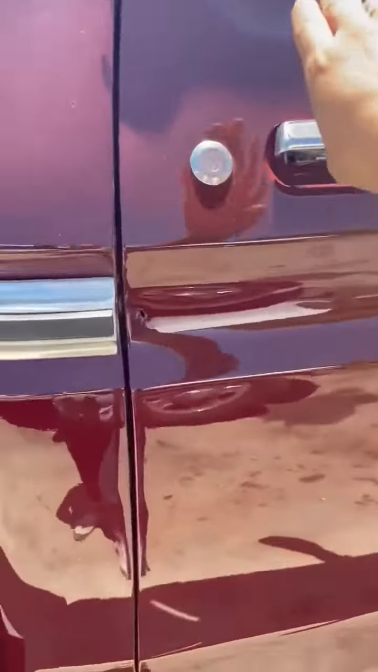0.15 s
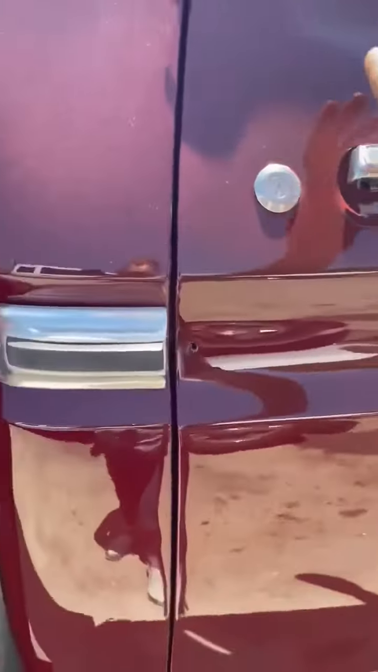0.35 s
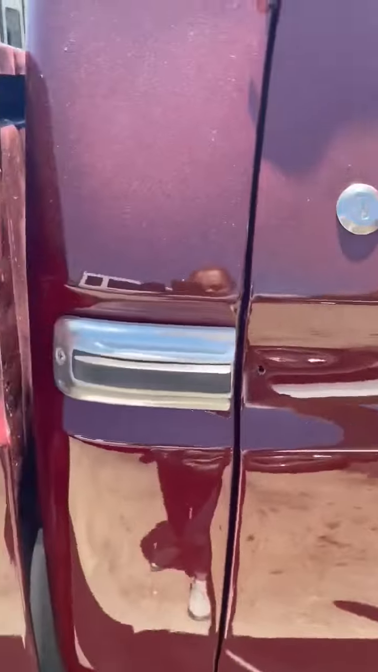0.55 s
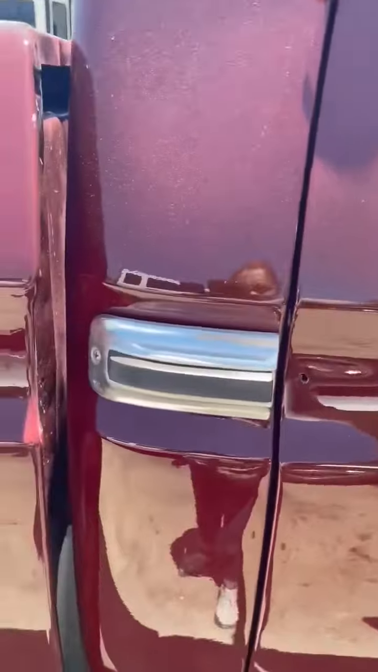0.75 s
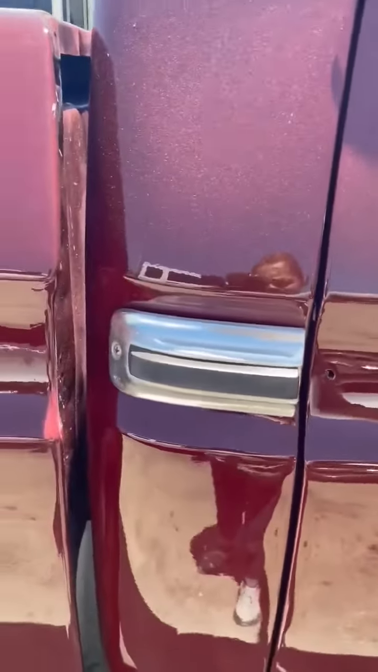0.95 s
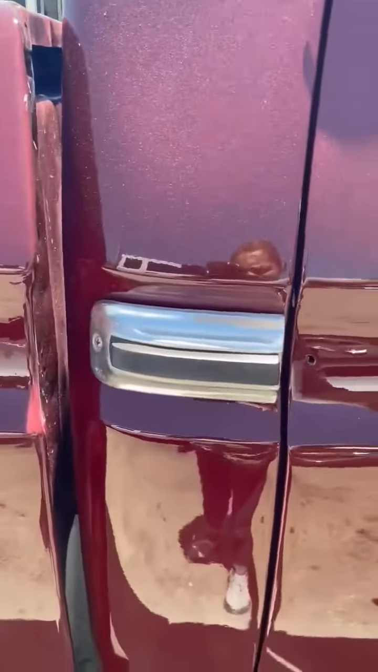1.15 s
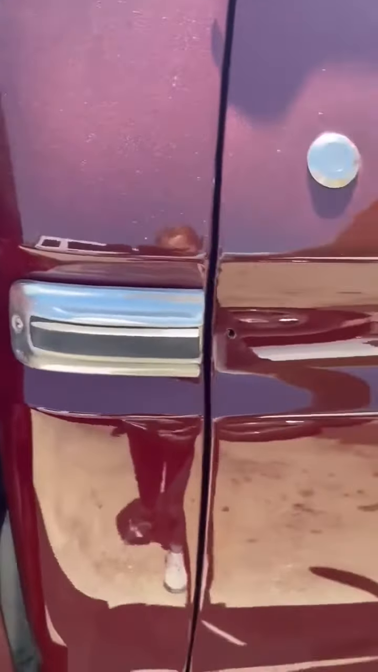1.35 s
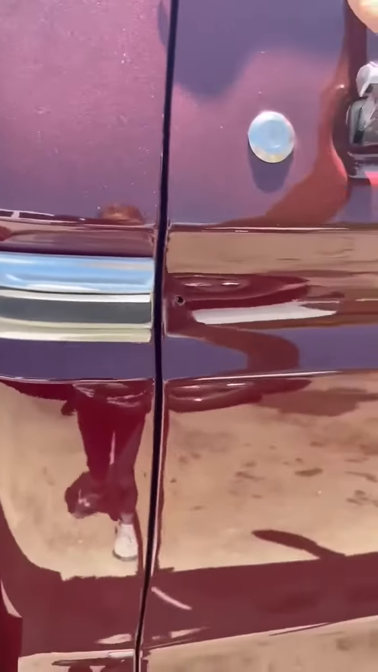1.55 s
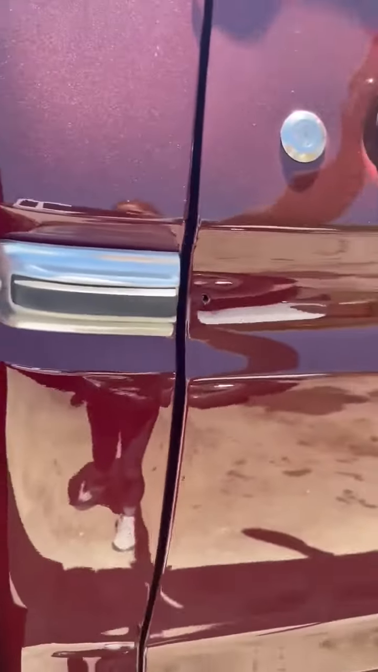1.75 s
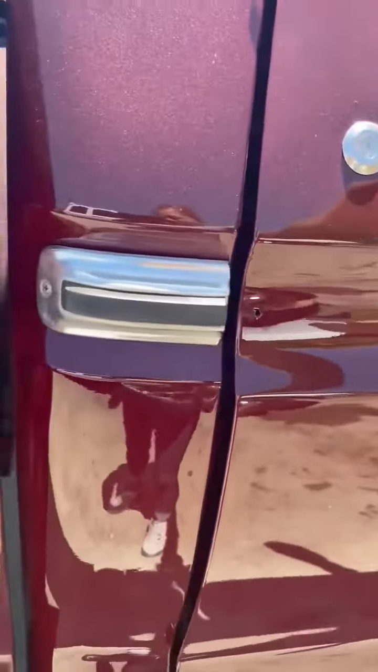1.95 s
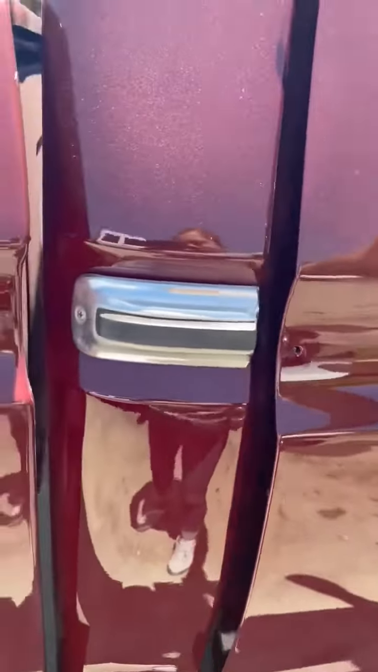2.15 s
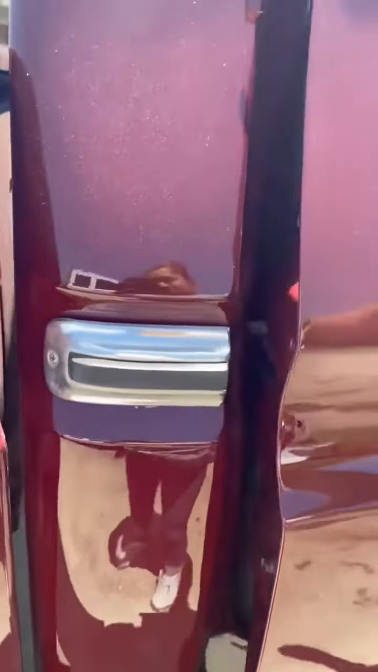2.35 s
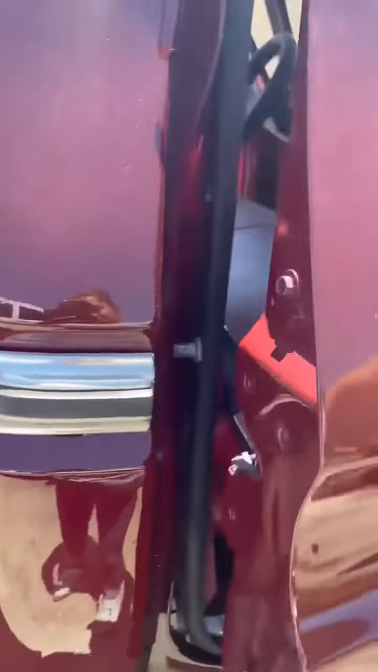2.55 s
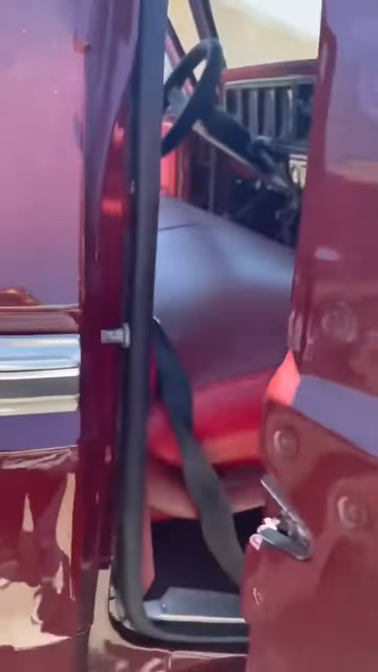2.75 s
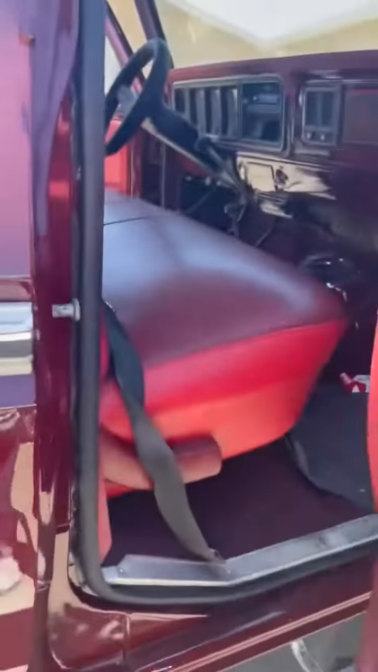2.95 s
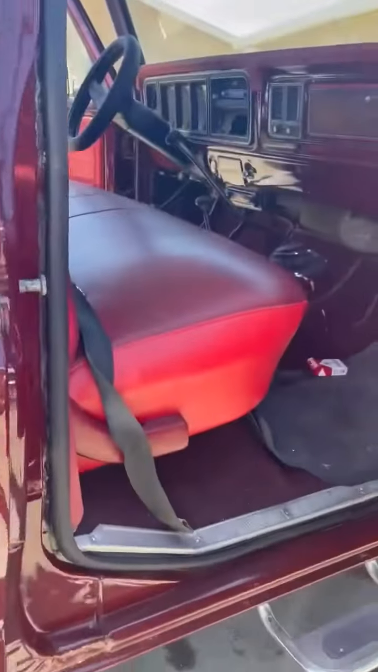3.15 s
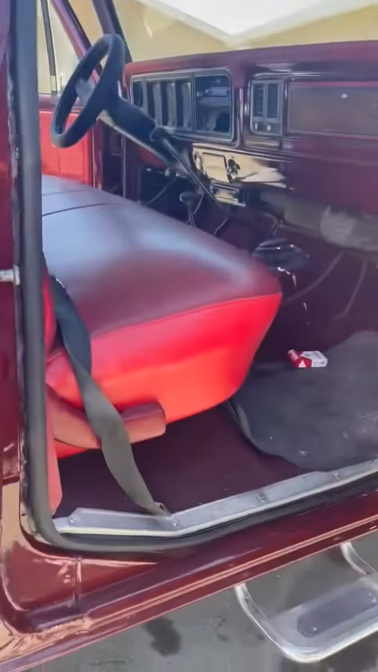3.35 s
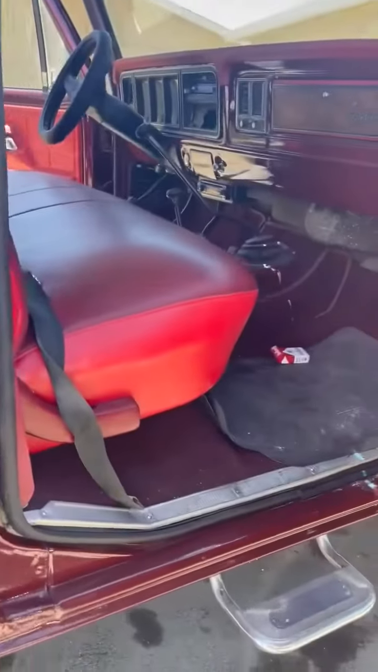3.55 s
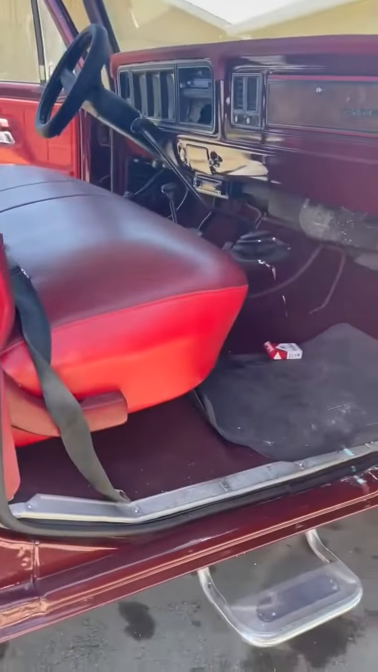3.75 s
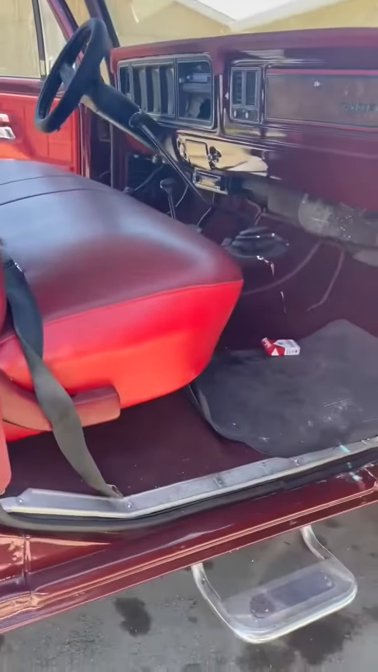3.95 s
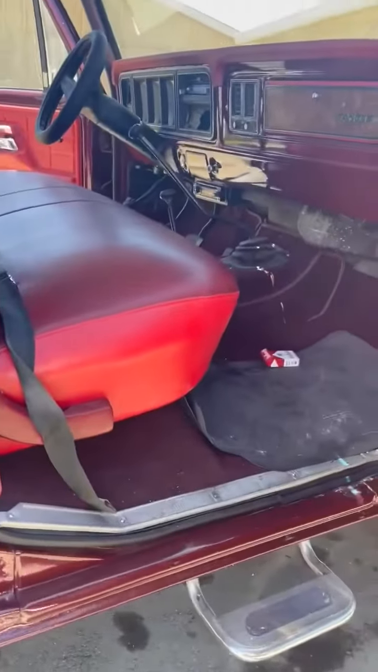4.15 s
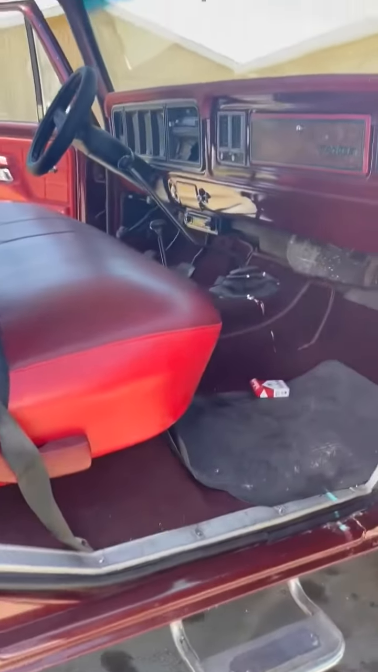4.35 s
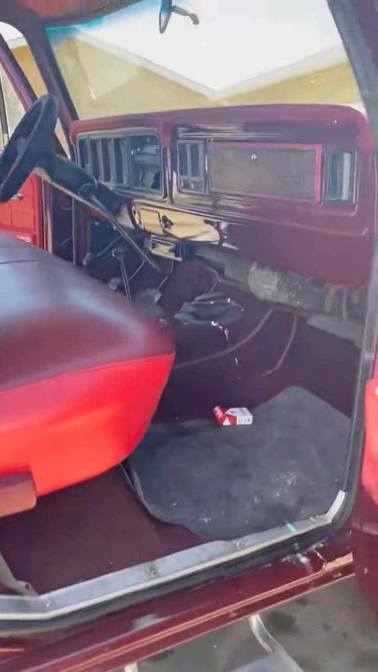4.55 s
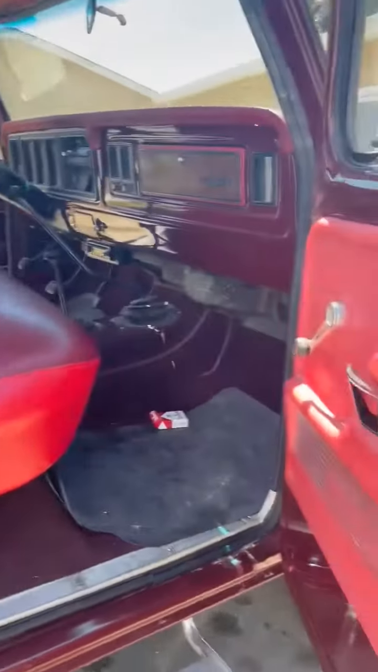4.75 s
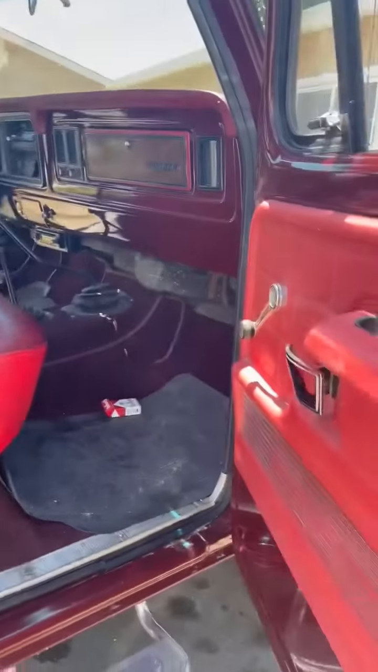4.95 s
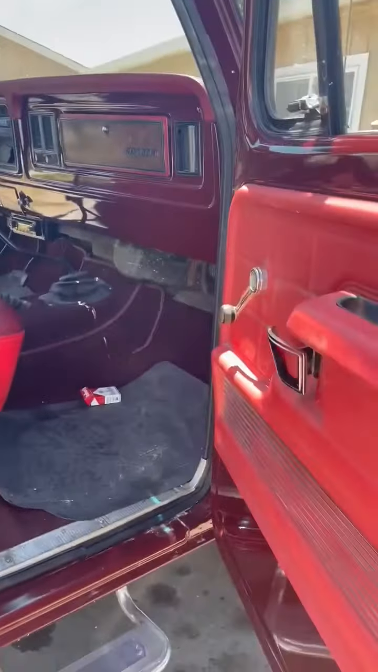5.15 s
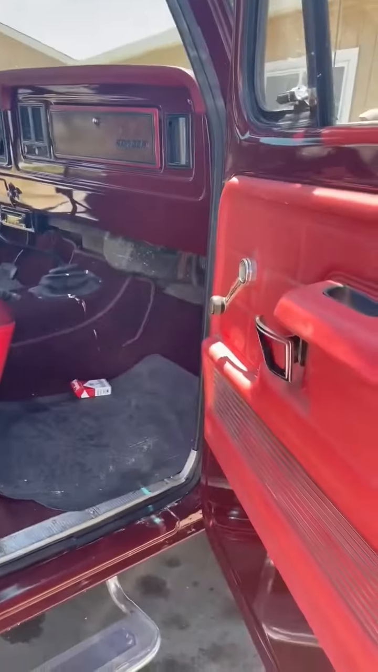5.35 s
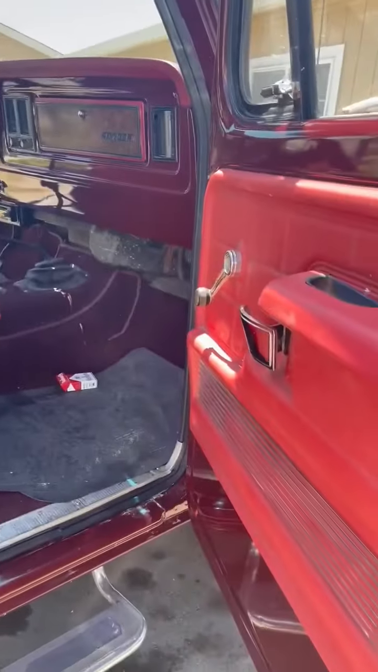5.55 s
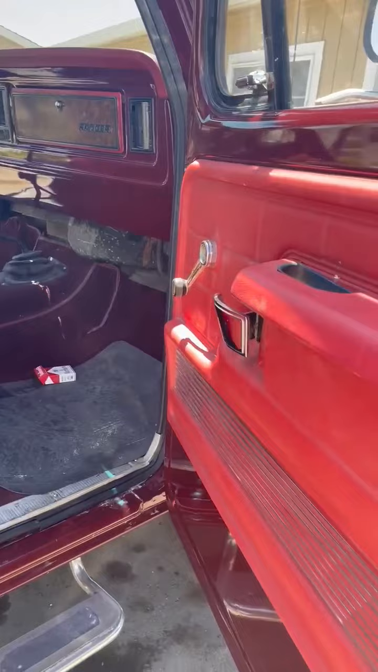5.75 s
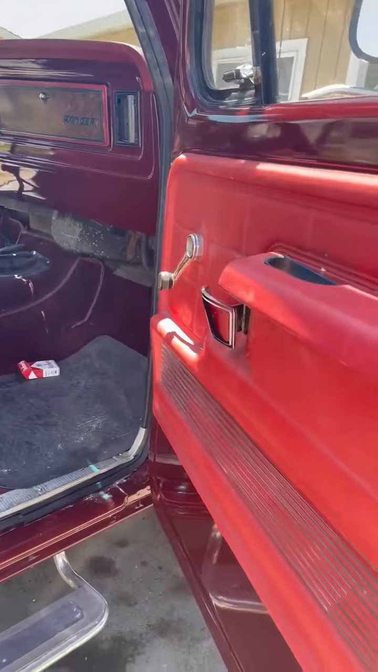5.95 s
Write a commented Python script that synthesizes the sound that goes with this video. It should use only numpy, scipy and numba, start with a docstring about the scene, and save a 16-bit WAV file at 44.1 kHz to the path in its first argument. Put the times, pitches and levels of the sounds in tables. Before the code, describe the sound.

Quiet open air with soft hiss, low rumble and a faint far hum, heard by a phone held close to an old truck's metal door. A barely audible tap comes at 0.1 s, then light dull handle knocks from 0.5 to 0.9. Around 1.1 a tight cluster of springy metallic clicks leads to a hard bright snap at 1.3. After a short gap, the latch lets go at 1.6 with the fullest clunk, metallic with a low hollow thump. From 1.75 to 2.2 the seal and hinge drag in a rough, grainy rub with small knocks and rattles, capped by a sharp knock at 2.18. A softer bump at 2.93 marks the door stop, with little taps after. Low, dull footfalls follow from 3.1, strongest near 3.6, then a brief gritty scuff and small thuds at 4.35-4.7. Only faint air and hum remain to 6 s.

```python
"""Old pickup door, opened by hand

A hand works the handle: linkage clicks, the latch lets go with a clunk, the seal drags free and
the door swings to its stop. Blows ring one set of damped door modes, filled out by dense noise;
the seal is stick-slip noise, and the thumps of the skin and the feet are short decaying sines.
Soles scuff grit; shaped noise makes the open air, a far hum, low rumble and faint narrow tones.
A phone held close hears it all."""
import sys
import numpy as np
from scipy import signal
from scipy.fft import rfft, irfft
from scipy.io import wavfile
from scipy.ndimage import uniform_filter1d
from numba import njit

SR = 44100
rng = np.random.default_rng(int(sys.argv[2]) if len(sys.argv) > 2 else 0)


def wav_out(sig):
    """Save sig, one row per channel (or a flat mono array), as 16-bit PCM at SR to the path in sys.argv[1]."""
    wavfile.write(sys.argv[1], SR, np.round(np.clip(np.atleast_2d(sig).T, -1, 1) * 32767).astype(np.int16))


N = 264159

# Open air before the phone: start_s, level_db (of the 300-6000 Hz part of the mid)
AIR_LEVEL = [(0.0, -52), (1.23, -50), (1.37, -52.5), (1.63, -48.5), (2.1, -48.5), (2.3, -55), (3.02, -50.5),
             (3.32, -54.5), (5.99, -55)]
# Spectrum of the air noise: pitch_hz, gain_db
AIR_COLOUR = [(59, -42.5), (100, -13.5), (165, -8.5), (210, -19), (487, -12.5), (684, -15.5), (1200, -17),
              (1350, -21.5), (1650, -19.5), (1860, -22.5), (2620, -23.5), (7270, -31.5), (9500, -38),
              (12000, -46), (15600, -73.5), (22000, -120)]
# Width of the air: pitch_hz, side_gain_db
AIR_SIDE = [(60, -28), (110, -24), (190, -19), (350, -3), (630, -1.5), (1120, -4), (2020, -5), (3630, 0.5),
            (6530, -6.5), (11700, 22)]
# A far machine: pitch_hz, width_hz, level_db, full_turn_change_db, left_minus_right_db
HUM = [(172, 14, -69, 10, 3.5), (333, 59, -58.5, -6.5, 12.5)]
# Low rumble: start_s, level_db
RUMBLE_LEVEL = [(0.0, -50.5), (.5, -43.5), (.65, -48), (.95, -37.5), (1.15, -48), (1.3, -60), (1.55, -44),
                (1.77, -38.5), (1.92, -40.5), (2.22, -41), (2.45, -49.5), (3.07, -42.5), (3.42, -51.5),
                (4.6, -52.5), (4.8, -55), (5.99, -52.5)]
# Spectrum of the rumble noise: pitch_hz, gain_db
RUMBLE_COLOUR = [(12, -38), (20, -17), (30, -10), (39, -2.5), (56, 0), (90, -5.5), (145, -7), (178, -12),
                 (300, -14), (390, -44), (660, -120)]
# Blows on handle, latch and door:
# start_s, part (name), panel_db, body_db, steel_db, half_rise_s, low_rattle_decay_s
KNOCKS = [ (.091, "stop", -49.5, -52, -59, 0.0021, 0.052), (.525, "handle", -42.5, -33, -41, 0.00056, 0.13),
          (.657, "handle", -42.5, -32, -42, 0.00041, 0.1), (.82, "card", -46, -31.5, -62, .003, .11),
          (.868, "skin", -54, -40, -55, 0.0028, 0.072), (1.0505, "rod", -56, -55, -42, .0003, .012),
          (1.053, "rod", -60, -27.5, -60, .002, 0.05), (1.108, "handle", -26.5, -28, -28, .0006, 0.077),
          (1.117, "spring", -33, -31, -48, .002, .03), (1.134, "spring", -32, -40, -27, 0.001, 0.08),
          (1.141, "spring", -30, -36, -26, .001, .05), (1.147, "handle", -23, -28, -14, .0004, 0.03),
          (1.148, "rod", -27, -45, -21, .0005, .04), (1.152, "spring", -26, -28, -21, .001, .045),
          (1.236, "handle", -43, -42, -48, .0012, 0.015), (1.273, "pawl", -26, -30, -17, 0.006, 0.02),
          (1.2875, "bolt", -13.5, -24, -8.5, 0.0018, 0.03), (1.293, "latch", -12, -21, -10, .0008, 0.018),
          (1.297, "latch", -15, -22, -19, .0006, .015), (1.304, "bolt", -25, -30, -30, .002, .07),
          (1.313, "latch", -26, -39, -42, .004, .07), (1.595, "catch", -16, -16, -11, .003, .042),
          (1.604, "catch", -19, -24, -7.5, .0016, 0.027), (1.61, "catch", -21, -25, -17.5, .0007, 0.1),
          (1.754, "skin", -36.5, -37.5, -63, 0.00071, 0.2), (1.784, "skin", -33, -32, -60, .0015, .042),
          (1.8, "hinge", -38, -36, -60, .001, .04), (1.866, "hinge", -38, -40, -60, .002, .03),
          (1.975, "striker", -38, -40, -52, .001, .08), (1.847, "rod", -48, -33.5, -48, 0.0022, .02),
          (1.881, "hinge", -26, -31, -44, 0.0005, 0.04), (1.897, "latch", -31, -28, -56, .001, .04),
          (1.907, "skin", -30, -28, -52, .001, 0.06), (1.932, "striker", -37, -34, -60, .002, .04),
          (1.951, "skin", -45, -32, -62, .001, .02), (2.007, "trim", -30, -34.5, -31, .0015, 0.1),
          (2.038, "trim", -33, -35.5, -28, .002, 0.09), (2.112, "rod", -38, -35.5, -54, 0.0015, 0.03),
          (2.138, "rod", -32, -33.5, -52, .0009, 0.16), (2.168, "striker", -24, -40, -42, 0.0023, .023),
          (2.1755, "striker", -11, -25, -34, 0.0009, 0.03), (2.184, "striker", -18, -25, -42, .001, .06),
          (2.196, "rod", -28.5, -27, -51, 0.002, .11), (2.235, "trim", -32.5, -31, -39, 0.00085, 0.065),
          (2.466, "skin", -50, -49, -67, 0.0021, 0.14), (2.615, "trim", -62, -65, -54, .001, .04),
          (2.69, "rod", -57, -65, -56, .001, .03), (2.769, "skin", -62, -44, -56, .002, 0.098),
          (2.923, "stop", -27, -36, -44, 0.005, 0.09), (2.941, "stop", -31, -38, -46, .002, .07),
          (2.962, "stop", -37, -38, -58, .002, .08), (3.06, "hinge", -53, -55, -65, .0005, .02),
          (3.078, "card", -48, -43, -62, .002, .04), (3.092, "striker", -38, -41, -48, 0.002, 0.05),
          (3.105, "handle", -40, -41, -54, .002, .06), (3.596, "stop", -55, -53, -54, 0.00069, .03),
          (4.172, "handle", -51, -65, -48, 0.00027, .012)]
# Where a blow lands sets its colour: body_hz, panel_hz, steel_hz, treble_top_hz,
# panel_and_steel_focus_db, boom_over_body_db, lean_db (left over right, before the side is coloured)
PARTS = {"handle": (255, 1101, 6400, 10500, -1, -6, -3.5), "rod": (405, 1506, 3299, 5500, -2, -13.5, 1.5),
         "latch": (574, 1152, 4893, 10500, -2, -14, -2.5), "catch": (348, 1051.5, 5320, 6800, 1.5, -5, 0.5),
         "hinge": (576, 2146, 4206, 7000, -1, -21, 4), "skin": (315.5, 1200, 2900, 4200, -8, -4, -4),
         "striker": (420, 1300, 3600, 6500, -2, -10.5, -3), "trim": (383, 1602, 5505, 9002, -11, -9.5, -2),
         "pawl": (500, 1900, 4900, 6200, 6, -14, -2.5), "bolt": (574, 1400, 7700, 10500, 1.5, -14, -2.5),
         "spring": (275, 1650, 6400, 7500, -5, -10, -3.5), "card": (480, 950, 2800, 3200, -4, -8, -2),
         "stop": (291.5, 2090, 3301, 5500, 5, -6.5, -2)}
# Modes of the whole door: pitch_hz, level_db, longest_t60_s
DOOR_MODES = [(115, 0, 0.051), (275, -8, .08), (333, -11.5, .5), (400, -10, 0.3), (600, -10, 0.2),
              (678, -10, .1), (802, -12, .08), (1042, -5, 0.18), (1152, -10, .1), (1285, -8, 0.15),
              (1450, -10, 0.09), (1647, -14, .09), (1800, -10, 0.13), (1916, -12, .15), (2093, -16, 0.2),
              (2242, -14, .15), (2430, -19, 0.11), (2690, -15, 0.1), (2910, -12, 0.1), (3250, -18, .12),
              (3470, -18, .1), (3690, -16, 0.1), (3910, -20, 0.14), (4140, -20, 0.1), (4800, -14, 0.1),
              (5195, -14, 0.06), (5355, -12, 0.09), (5850, -15, 0.07), (6240, -18, 0.07), (6510, -16, 0.09),
              (6990, -18, .07), (7700, -15, 0.08), (8250, -19, 0.1), (8900, -19, 0.07)]
# Width of the door sounds: pitch_hz, side_gain_db
DOOR_SIDE = [(60, -17), (110, -29), (190, -24), (350, -12), (630, -2.5), (1120, -9.5), (2020, -9),
             (3630, -4), (6530, -6.5), (11700, 21.5)]
# Low and high edges of the panel, boom, body and steel bands in turn: edge_hz
BAND_EDGES_HZ = [700, 2500, 95, 200, 200, 700, 2500, 11000]
# Quiet tail of the dense ring for panel, boom, body, steel: decay_s
BAND_TAIL_S = [0.17, 0.07, 0.26, 0.15]
# Trim and seals damp the modes of panel, boom, body, steel: longest_t60_s
LONGEST_RING_S = [0.075, 0.08, 0.085, 0.045]
# Dense ring against the modes for panel, boom, body, steel: level_db
DENSE_DB = [0, 2.5, .5, 0]
# Two drags of the rubber seal and hinge: start_s, level_db, treble_db (against the level)
DRAG = [
    [(.75, -61.5, -4.5), (.87, -53.5, -1), (1.05, -57, -3)],
    [(1.7, -54, -33), (1.77, -41, -25), (1.83, -40, -21), (1.95, -38, -18), (2.05, -35, -11),
     (2.1, -42, -9), (2.17, -47, -5), (2.35, -54.5, -12)],
]
# Faint narrow tones around the work on the latch: start_s, end_s, pitch_hz, level_db
WHINES = [(1.36, 1.58, 400, -54), (1.324, 1.6, 2080, -60), (1.64, 1.75, 2200, -59), (.91, 1.03, 2100, -59)]
# The door skin thumps and hums under harder blows: start_s, level_db, first_hz, last_hz, t60_s
THUMPS = [(1.117, -27, 300, 265, .07), (1.152, -25, 290, 265, .09), (1.2935, -21, 230, 170, .028),
          (1.601, -7, 250, 115, .095), (1.599, -27, 58, 58, .4), (1.882, -28, 590, 570, .16),
          (2.182, -25, 380, 325, .16), (2.186, -26, 410, 400, .3), (2.205, -30, 140, 125, .08),
          (2.93, -37, 330, 215, .2), (2.932, -38, 500, 480, .12), (2.98, -37, 110, 110, .12)]
# Dull thuds of feet on the ground: start_s, level_db, pitch_hz
THUDS = [(3.12, -37, 140), (3.218, -38, 70.3), (3.248, -41.5, 82), (3.43, -41.5, 75), (3.573, -25.5, 83.4),
         (3.638, -36.5, 64.6), (3.701, -39.5, 90), (3.739, -34.5, 53.2), (3.849, -36, 61.6),
         (3.91, -37.5, 67.3), (4.028, -37.5, 56.6), (4.393, -43, 310), (4.403, -41, 108), (4.43, -45, 260),
         (4.451, -34, 159.5), (4.47, -36, 132), (4.669, -44.5, 148)]
# Soles scuffing grit: start_s, level_db, length_s
SCUFFS = [(4.349, -52, .008), (4.359, -38.5, .016), (4.374, -46, .025), (4.40, -53, .08),
          (4.496, -39, .012), (4.51, -36, .028)]

PORT_LAG = 24  # samples between the two microphone ports
TURN_S = 4.51  # the phone turns towards the open door
BOOM_HZ = 135
LOW_FOCUS_DB = -1  # boom and body get the same focus for all parts
MODE_SCATTER_DB = 3  # each blow favours other modes
DETUNE = .004  # spread of mode pitches: the loose door never rings twice quite alike
SNAP_DB = 7  # first hard touch, added over the rattle
WHINE_WIDTH_HZ = 45
SAG_S = .006  # time constant of the pitch sag as the skin settles
THUD_DECAY_S = 0.12  # to -60 dB
THUD_SLAP_DB = -13  # noisy contact on top of a thump or thud
STONE_LOW_HZ, STONE_HIGH_HZ = 900, 8200
STONE_S, STONE_DB = .0022, 2  # half width of a click, level of all the clicks in a scuff
TOP_HZ = 11900  # the phone's upper limit


def undb(db):
    """Turn decibels into an amplitude factor."""
    return 10 ** (np.asarray(db) / 20)


def unit(x):
    """Bring a signal to an RMS of one."""
    return x / np.sqrt(np.mean(x ** 2))


def band(x, lo, hi):
    """Keep the pitches between lo and hi in Hz."""
    return signal.sosfilt(signal.butter(2, [lo, hi], "band", fs=SR, output="sos"), x)


def colour(x, points):
    """Shape the spectrum by pitch_hz, gain_db points, straight lines on a log pitch scale."""
    hz, db = np.transpose(points)
    f = np.fft.rfftfreq(x.shape[-1], 1 / SR) + 1  # the 1 Hz keeps the log finite
    curve = undb(np.interp(np.log(f), np.log(hz), db))
    return irfft(rfft(x) * curve, x.shape[-1])


def gain(table, column):
    """Draw a gain in time from a dB column, silent outside the table."""
    rows = np.array(table)
    return undb(np.interp(np.arange(N) / SR, rows[:, 0], rows[:, column], left=-200, right=-200))


def walk(rate):
    """Wander through random levels held 1 / rate s and slewed twice."""
    hold = int(SR / rate)
    steps = np.repeat(rng.standard_normal(N // hold + 1), hold)
    slewed = uniform_filter1d(uniform_filter1d(steps, hold), hold)
    return unit(slewed[:N])


def stereo(mid, side, points, lean_db=0):
    """Make left and right from mid and side; the side share depends on pitch."""
    # sound from one flank cancels where the lag is whole cycles, and adds up there in the middle
    side = side - 0.47 * np.roll(side, PORT_LAG)
    mid = mid + 0.028 * np.roll(mid, PORT_LAG)
    lean = np.tanh(lean_db * np.log(10) / 40)
    side = colour(side + lean * mid, points)
    return np.array([mid + side, mid - side])


def add(out, sound, s):
    """Lay a sound into the mix at s seconds."""
    i = int(s * SR)
    out[..., i:i + sound.shape[-1]] += sound[..., :N - i]


def grit(size, spread_db):
    """Noise of uneven grains: a random boost on every sample makes it spiky."""
    boost = np.minimum(rng.exponential(1, size), 5)
    return rng.standard_normal(size) * undb(spread_db * boost)


@njit
def ring(x, hz, size, t60):
    """Damped modes driven by x, each a decaying rotation."""
    y = np.zeros(len(x))
    for k in range(len(hz)):
        turn, z = np.exp((2j * np.pi * hz[k] - np.log(1000) / t60[k]) / SR), 0j
        for i in range(len(x)):
            z = z * turn + x[i]
            y[i] += size[k] * z.imag
    return y


def air():
    """Wide hiss of open air: coloured noise with a slowly uneven level."""
    mid, side = (colour(rng.standard_normal(N), AIR_COLOUR) for _ in range(2))
    scale = np.std(band(mid, 300, 6000))
    return stereo(mid, side, AIR_SIDE) / scale * gain(AIR_LEVEL, 1) * undb(.8 * walk(5.6))


def far_hum():
    """A far machine: narrow noise bands that waver and change level as the phone turns."""
    out = np.zeros((2, N))
    turn = np.clip(np.arange(N) / SR - TURN_S, 0, .2) / 0.22  # stops at ten elevenths of a full turn
    for hz, width, level_db, turn_db, lean_db in HUM:
        hum = unit(band(rng.standard_normal(N), hz - width / 2, hz + width / 2))
        sides_db = np.array([[lean_db], [-lean_db]]) / 2
        out = out + hum * undb(level_db + turn_db * turn + 2.0 * walk(0.69) + sides_db)
    return out


def low_rumble():
    """Low coloured noise of uneven level, the same on both sides."""
    rumble = unit(colour(rng.standard_normal(N), RUMBLE_COLOUR))
    return rumble * gain(RUMBLE_LEVEL, 1) * undb(0.83 * walk(4.3))


def blow(hz, db, t60, centre_hz, focus_db, half_rise_s, rattle_s, lo, hi, tail_s, dense_db, t):
    """One band of a blow: snap and rattle ring modes near its pitch, a dense ring fills between."""
    rattle_s = rattle_s * min(500 / lo, 1) ** 0.68  # treble dies first
    rise_s = 2 * half_rise_s

    def fade(decay_s):
        return np.exp(-np.log(1000) * np.maximum(t - rise_s, 0) / decay_s)

    rise = np.minimum(t / rise_s, 1) ** 2
    snap = 1 + undb(SNAP_DB) * np.exp(-((t - rise_s) / (0.15 * half_rise_s + .0002)) ** 2)
    contact = grit(len(t), 3.4) * rise * fade(rattle_s) * snap

    near_db = -7.5 * np.abs(np.log2(hz / centre_hz))  # modes weaken per octave from the centre
    mode_hz = hz * (1 + DETUNE * rng.standard_normal(len(hz)))
    mode_db = db + near_db + MODE_SCATTER_DB * rng.standard_normal(len(hz))
    modes = ring(contact, mode_hz, undb(mode_db), t60)

    wash = grit(len(t), 3.1) * rise * (fade(1.5 * rattle_s) + undb(-15) * fade(tail_s))
    dense = band(wash + 0.4 * contact, max(lo, centre_hz / 2.1), min(hi, 1.9 * centre_hz))
    focus = band(contact, centre_hz / 1.045, centre_hz * 1.045)
    return unit(band(modes, lo, hi)) + undb(dense_db) * unit(dense) + undb(focus_db) * unit(focus)


def door_blows():
    """Every blow rings the same door; the part that is struck sets the pitches."""
    hz, db, t60 = np.transpose(DOOR_MODES) * 1.
    t = np.arange(SR // 5) / SR
    out, lean = np.zeros((2, N)), np.zeros(N)
    edges = np.reshape(BAND_EDGES_HZ, (4, 2))
    for s, part, panel_db, body_db, steel_db, half_rise_s, rattle_s in KNOCKS:
        body_hz, panel_hz, steel_hz, top_hz, focus_db, boom_db, lean_db = PARTS[part]
        centres = panel_hz, BOOM_HZ, body_hz, steel_hz
        levels_db = panel_db, body_db + boom_db, body_db, steel_db
        focuses_db = focus_db, LOW_FOCUS_DB, LOW_FOCUS_DB, focus_db
        soften = signal.butter(2, 1.5 * top_hz, fs=SR, output="sos")
        for (lo, hi), peak_db, centre_hz, sharp_db, tail_s, ring_s, dense_db in zip(
                edges, levels_db, centres, focuses_db, BAND_TAIL_S, LONGEST_RING_S, DENSE_DB):
            hi = min(hi, top_hz)
            use = (hz >= lo) & (hz < hi)
            modes = hz[use], db[use], np.minimum(t60[use], ring_s)
            mid_side = np.array([
                blow(*modes, centre_hz, sharp_db, half_rise_s, rattle_s, lo, hi, tail_s, dense_db, t)
                for _ in range(2)])
            mid_side = signal.sosfilt(soften, mid_side)
            # level each band by the loudest short stretch of its mid
            power = uniform_filter1d(mid_side[0] ** 2, int(SR * (0.0097 + 1 / lo)))
            add(out, mid_side * undb(peak_db) / np.sqrt(power.max()), s)
        lean[int(s * SR):] = lean_db
    return stereo(*out, DOOR_SIDE, lean)


def seal_drag():
    """Stick-slip: uneven grains set the door skin ringing, with a finer hiss on top."""
    hz, db, t60 = np.transpose([m for m in DOOR_MODES if 300 < m[0] < 2500]) * 1.
    out, skin = 0, []
    for _ in range(2):  # mid, side
        slips = grit(N, 6.2) * undb(4.6 * walk(60.0))
        rub = unit(band(band(slips, 250, 1900), 150, 2800))
        ringing = unit(ring(slips, hz, undb(db), np.minimum(t60, .12)))
        skin.append(unit(rub + 1.1 * ringing))
    hiss = np.array([unit(band(grit(N, 4.8), 3400, 7000)) for _ in range(2)])
    for table in DRAG:
        out = out + gain(table, 1) * (np.array(skin) + gain(table, 2) * hiss)
    return stereo(*out, DOOR_SIDE)


def whines():
    """Narrow bands of noise that swell and fade."""
    out = np.zeros((2, N))
    for start, end, hz, level_db in WHINES:
        size = int((end - start) * SR)
        noise = rng.standard_normal((2, SR // 2))
        tone = unit(band(noise, hz - WHINE_WIDTH_HZ / 2, hz + WHINE_WIDTH_HZ / 2))
        tone = tone[:, -size:]  # the settled end of the filtered noise
        add(out, undb(level_db) * tone * signal.windows.tukey(size, .4), start)
    return stereo(*out, DOOR_SIDE)


def thumps_and_footfalls():
    """Soft decaying sines under a noisy slap: the door skin sags in pitch, feet hold theirs."""
    out, t = np.zeros((2, N)), np.arange(SR // 4) / SR
    footfalls = [(s, level_db, hz, hz, THUD_DECAY_S) for s, level_db, hz in THUDS]
    for s, level_db, first_hz, last_hz, t60 in THUMPS + footfalls:
        sag_cycles = (first_hz - last_hz) * SAG_S * (1 - np.exp(-t / SAG_S))
        tone = np.sin(2 * np.pi * (last_hz * t + sag_cycles))
        slap = unit(band(rng.standard_normal(len(t)), 1.4 * last_hz, 2.74 * last_hz))
        attack = 1 - np.exp(-t * first_hz / .32)
        thud = (tone + undb(THUD_SLAP_DB) * slap) * attack * np.exp(-np.log(1000) * t / t60)
        loudest = np.sqrt(uniform_filter1d(thud ** 2, SR // 100).max())
        add(out, undb(level_db) * thud / loudest * np.ones((2, 1)), s)
    return out


def stones(length_s, t, count=24):
    """Stones that click under the sole: short pitched bursts scattered over a scuff."""
    when, pitch, size = rng.random((3, count, 1))
    hz = STONE_LOW_HZ * (STONE_HIGH_HZ / STONE_LOW_HZ) ** pitch
    late = t - 1.5 * length_s * when
    clicks = np.exp(-(late / STONE_S) ** 2) * np.sin(2 * np.pi * hz * late)
    return np.sum(undb(-14 * size) * clicks, axis=0)


def scuffs():
    """Soles on grit: short bursts of grainy noise with stones clicking in them."""
    out, t = np.zeros((2, N)), np.arange(SR // 4) / SR
    for s, level_db, length_s in SCUFFS:
        shape = (1 - np.exp(-t / 0.002)) * np.exp(-(t / length_s) ** 2)
        crunch = unit(band(band(grit((2, len(t)), 3.0), 800, 8600), 300, 9000))
        crunch = crunch + 0.6 * unit(band(grit(len(t), 3.2), 200.0, 560))  # low, centred
        crunch = crunch + undb(STONE_DB) * stones(length_s, t) * [[1], [.7]]  # louder on the left
        add(out, undb(level_db) * shape * crunch, s)
    return out


def scene():
    """Lay the door and the feet over the open yard."""
    yard = air() + far_hum() + low_rumble()
    door = door_blows() + seal_drag() + whines()
    return yard + door + thumps_and_footfalls() + scuffs()


def record(dry):
    """The phone dulls the treble, rounds the loudest peaks and cuts off the top."""
    dull = colour(dry, [(20, -2), (7600, -9), (8400, -14), (11000, -14.5), (11600, -31.5)])
    rounded = np.tanh(0.81 * dull) / 0.77
    return signal.sosfilt(signal.ellip(8, .2, 70, TOP_HZ, fs=SR, output="sos"), rounded)


dry = scene()
out = record(dry)
wav_out(out)
```